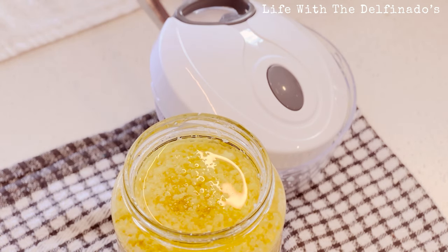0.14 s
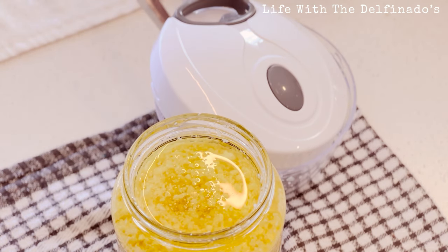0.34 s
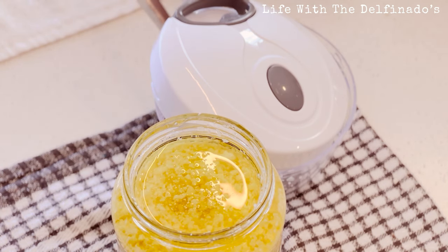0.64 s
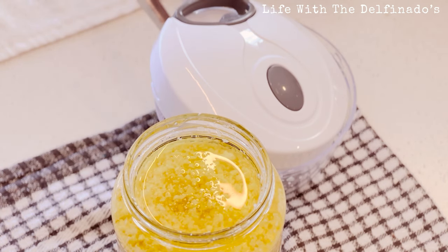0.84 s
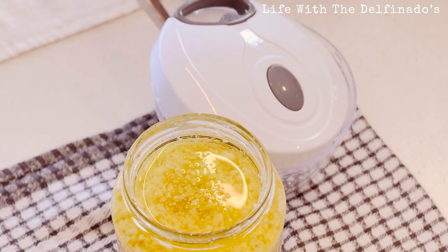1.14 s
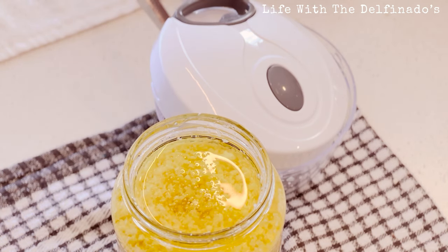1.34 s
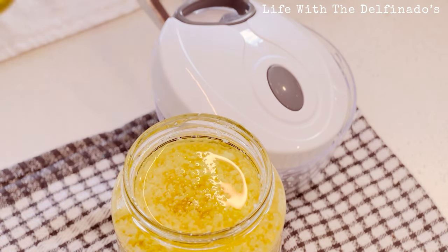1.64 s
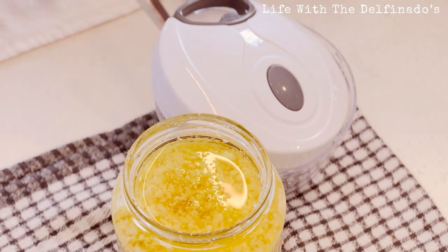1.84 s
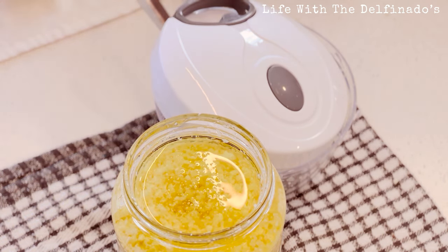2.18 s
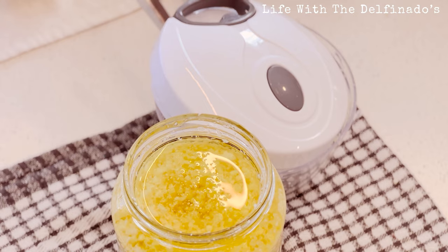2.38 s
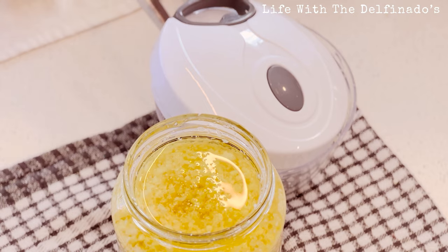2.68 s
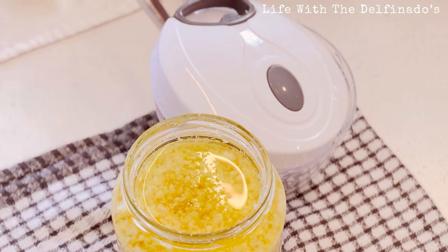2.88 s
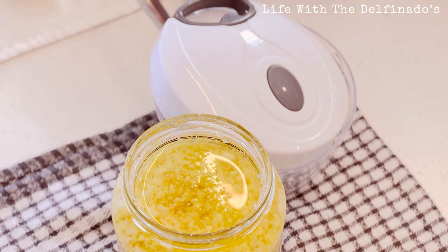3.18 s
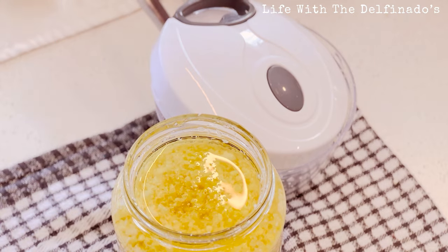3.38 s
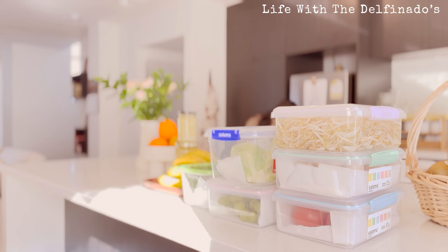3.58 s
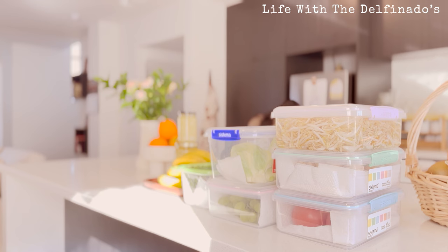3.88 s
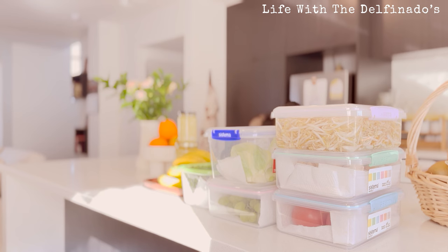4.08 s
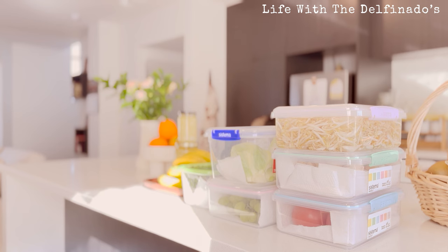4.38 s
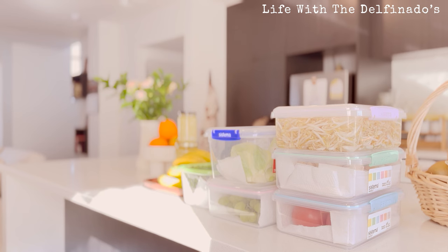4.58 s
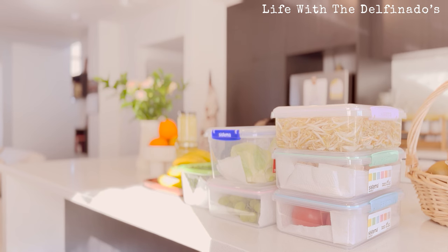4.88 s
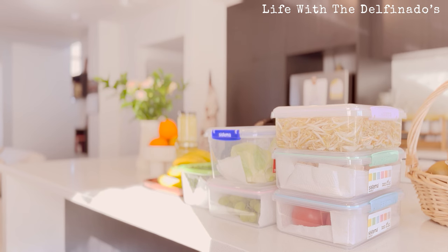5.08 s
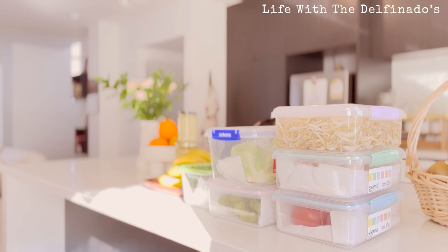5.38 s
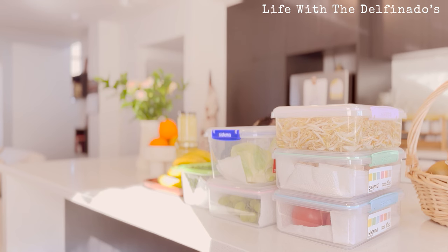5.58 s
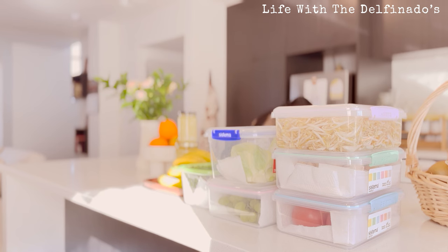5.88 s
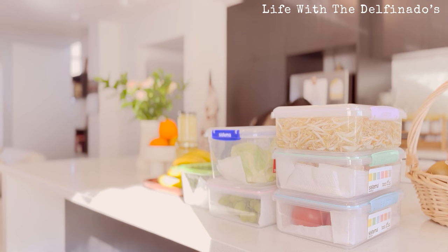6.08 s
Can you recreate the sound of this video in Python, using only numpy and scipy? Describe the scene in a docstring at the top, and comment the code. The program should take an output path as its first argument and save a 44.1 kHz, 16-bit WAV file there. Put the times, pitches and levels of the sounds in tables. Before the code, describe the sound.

In a hard-walled kitchen, a glass jar is rubbed and ticks faintly close to a stereo microphone pair, and the table takes a soft bump. Halfway through, the faint background hum grows into a louder, steady fridge hum. Further off, sheets of paper crinkle into a plastic drawer, which scrapes along its rails, rattles and bangs shut with a short room echo.

```python
"""Putting things away in a kitchen

A stereo pair stands in a hard-walled kitchen. The background crossfades from a faint wavering hum
and light room tone to a louder, steady fridge hum and deep room tone.
Close to the microphones a glass jar is rubbed and ticks faintly, and the table takes a soft bump.
Further off, sheets of paper crinkle into a plastic drawer, which scrapes, rattles and bangs shut."""
import sys
import numpy as np
from scipy import signal
from scipy.fft import rfft, irfft
from scipy.io import wavfile
from scipy.ndimage import uniform_filter1d

SR = 44100
rng = np.random.default_rng(int(sys.argv[2]) if len(sys.argv) > 2 else 0)


def transcribe(signal):
    """Save signal, clipped to [-1, 1], as a 16-bit WAV file at the path in sys.argv[1]."""
    frames = np.atleast_2d(signal).T
    limited = np.clip(frames, -1, 1)
    pcm = np.round(limited * 32767).astype(np.int16)
    wavfile.write(sys.argv[1], SR, pcm)


N = 274743
TIME = np.arange(N) / SR


def gain_of(db):
    """Decibels to a factor."""
    return 10 ** (np.asarray(db) / 20)


def unit_rms(x):
    """Scales to an rms of 1."""
    return x / np.sqrt(np.mean(x ** 2) + 1e-20)


def unit_burst(x):
    """Scales a short sound so that its energy, spread over 30 ms, has an rms of 1."""
    return x / np.sqrt(np.mean(np.sum(x ** 2, -1)) / (.03 * SR) + 1e-20)


def at_hz(points, hz):
    """Reads a spectrum on a log-frequency axis."""
    f, value = np.transpose(points)
    return np.interp(np.log(hz + 1), np.log(f + 1), value)


def over_time(points):
    """Joins (time, value) points into a curve."""
    return np.interp(TIME, *np.transpose(points))


def decay(t, t60):
    """Falls by 60 dB in t60 seconds."""
    return np.exp(-np.log(1000) * t / np.maximum(t60, 1e-3))


def swell(t, rise, t60):
    """A soft start and an exponential decay."""
    return (1 - np.exp(-t / rise)) * decay(t, t60)


def stroke(start, rise, length, sag_db_per_s, release_t60):
    """A hand movement: it builds up smoothly, weakens while it lasts, then dies away."""
    t = TIME - start
    attack = np.sin(np.pi / 2 * np.clip(t / max(rise, 1e-3), 0, 1)) ** 2
    sag = gain_of(-sag_db_per_s * np.maximum(t - rise, 0))
    return attack * sag * decay(np.maximum(t - length, 0), release_t60)


def swings(size):
    """Random swings of rms 1, each lasting about size samples."""
    return unit_rms(uniform_filter1d(rng.standard_normal(N), size=size))


def crackle(length, per_s, spread_db):
    """Random clicks of uneven size."""
    sizes = gain_of(spread_db * np.minimum(rng.exponential(1, length), 4))
    return unit_rms(sizes * rng.choice([-1, 1], length) * (rng.random(length) < per_s / SR))


def colour(x, db_at, size=4096):
    """Minimum-phase filter with the gain db_at(f)."""
    hz = abs(np.fft.fftfreq(size, 1 / SR))
    log_gain = np.log(gain_of(np.maximum(db_at(hz), -100)))
    taps = np.fft.ifft(np.exp(np.conj(signal.hilbert(log_gain)))).real[:size // 2]
    return signal.fftconvolve(np.atleast_2d(x), taps[None], axes=1)[:, :x.shape[-1]]


def add(mix, start, sound):
    """Mixes a sound in at start seconds."""
    part = mix[:, round(start * SR):][:, :sound.shape[-1]]
    part += sound[..., :part.shape[-1]]


def pan(right_db):
    """Gains of the two microphones, the right one louder by right_db."""
    return gain_of(np.array([[-.5], [.5]]) * right_db)


def from_right(x, samples):
    """The sound reaches the right microphone a few samples before the left."""
    return np.array([np.roll(x[0], samples), x[-1]])


# reverberation between the hard walls: f/Hz, t60/s
ROOM_DECAY = [(100, 0.22), (400, 0.55), (1200, 0.53), (2700, 0.5), (5500, 0.43), (8000, 0.36),
              (15000, 0.032)]


def kitchen(x, wet_db, early_db=0, early_t60=0.097, size=32000):
    """Direct sound, then reflections from the counter and the long tail of the room."""
    echoes = rng.standard_normal((2, size)) * (rng.random((2, size)) < .12)
    hz, t, bands = signal.stft(echoes, SR, nperseg=256)
    fade = decay(t, at_hz(ROOM_DECAY, hz)[:, None]) + gain_of(early_db) * decay(t, early_t60)
    response = signal.istft(bands * fade, SR, nperseg=256)[1]
    response *= gain_of(wet_db) / np.linalg.norm(response, axis=1, keepdims=True)
    response[:, 0] += 1  # direct path
    heard = signal.fftconvolve(np.atleast_2d(x), response, axes=1)[:, :x.shape[-1]]
    return heard / np.sqrt(1 + gain_of(wet_db) ** 2)


def air(spectrum, level_db, likeness, balance):
    """Steady noise, alike at both microphones in the bass; the level is that of its low mids."""
    hz = np.fft.rfftfreq(N, 1 / SR)
    left, unrelated = rfft(rng.standard_normal((2, N)))
    same = np.clip(at_hz(likeness, hz), -1, 1)
    right = same * left + np.sqrt(1 - same ** 2) * unrelated
    pair = np.array([left, right]) * gain_of(at_hz(spectrum, hz))
    low_mids = irfft(pair[0] * (hz > 110) * (hz < 900), N)
    return gain_of(level_db) * irfft(pair * pan(-at_hz(balance, hz)), N) / low_mids.std()


# spectra of the light and the deep room tone: f/Hz, relative level/dB
LIGHT_SPECTRUM = [(20, -21), (58, -7.5), (97, -6), (150, -13.5), (260, -16), (420, -19.5), (850, -27),
                  (1200, -38.5), (2000, -38.5), (3500, -53.5), (8500, -46), (10200, -53), (12000, -50.5),
                  (16000, -101)]
DEEP_SPECTRUM = [(20, -15), (35, -14.5), (55, -1.5), (75, -0.5), (105, -17), (135, -16), (270, -16),
                 (400, -21), (600, -36.5), (1200, -42.5), (5000, -54.5), (7600, -46), (10000, -65.5),
                 (16000, -72)]
# their likeness at the two microphones: f/Hz, correlation (-1 to 1)
LIGHT_LIKENESS = [(60, 1), (130, 0.86), (290, 1), (640, 0.39), (1410, 0.058), (3100, 1), (6800, 0.1)]
DEEP_LIKENESS = [(60, 0.81), (130, 1), (290, 0.25), (640, -0.09), (1410, -0.53), (3100, 0.25),
                 (6800, -0.16)]
# their balance: f/Hz, left over right/dB
LIGHT_BALANCE = [(180, -0.5), (550, 1), (1650, -4), (5000, -2), (15000, 0)]
DEEP_BALANCE = [(60, -2), (180, -2), (1650, 2.5), (5000, 6), (15000, 6)]
# the crossfade between them: t/s, deep share of the power (0 to 1)
DEEP_SHARE = [(0, 0.19), (2.95, 0.21), (3.6, 0.96), (6.23, 0.92)]


def room_tone():
    """The room tone, all round the microphones, crossfades from light to deep."""
    share = np.clip(over_time(DEEP_SHARE), 0, 1)
    light = air(LIGHT_SPECTRUM, level_db=-51.5, likeness=LIGHT_LIKENESS, balance=LIGHT_BALANCE)
    deep = air(DEEP_SPECTRUM, level_db=-49.5, likeness=DEEP_LIKENESS, balance=DEEP_BALANCE)
    return np.sqrt(1 - share) * light + np.sqrt(share) * deep


def motor_turns(hz, waver):
    """A motor's turns, counted from a random start, at a slightly unsteady speed."""
    return np.cumsum(hz * (1 + waver * swings(size=4000))) / SR + rng.random()


# the faint hum, one tone near 82 Hz with two neighbours too weak to hear: f/Hz, level/dB
FAINT_TONES = [(78.8, -101), (81.9, -46), (84.0, -95.5)]
# overtones and side tones of the steady hum: multiple of its pitch, relative level/dB
HUM_OVERTONES = [(1.27, -18.5), (1.999, -18), (3.001, -18), (3.498, -29.5), (4.559, -36.5)]


def fridge(hum_hz=78.9, hum_db=-34, fade_from_s=2.59, fade_length_s=1.45):
    """A faint, slightly wavering tone crossfades to a louder, steady hum right of the microphones."""
    faint = sum(gain_of(db) * np.sin(2 * np.pi * motor_turns(hz, waver=0.0079))
                for hz, db in FAINT_TONES)
    turns = motor_turns(hum_hz, waver=0.0022)
    overtones = sum(gain_of(db) * np.sin(2 * np.pi * (multiple * turns + rng.random()))
                    for multiple, db in HUM_OVERTONES)
    hum = gain_of(hum_db) * pan(right_db=3) * (np.sin(2 * np.pi * turns) + overtones)
    fade = np.clip((TIME - fade_from_s) / fade_length_s, 0, 1)
    return np.sqrt(2) * ((1 - fade) * faint + fade * from_right(hum, samples=10))


# bumps of the table and the cabinet: t/s, level/dB, f/Hz, t60/s
FURNITURE_BUMPS = [(2.035, -25, 145, 0.18), (2.049, -23, 87.5, 0.25), (2.067, -29, 57.4, 0.6),
                   (2.14, -35, 128, 0.22), (4.065, -22.5, 101, 0.37), (4.108, -30, 119, 0.091),
                   (4.6, -17, 193, 0.36), (4.606, -18, 100, 0.31)]


def furniture(rise_s=0.00092, size=16000):
    """Each dull bump rings one low mode, alike at both microphones."""
    out, t = np.zeros((2, N)), np.arange(size) / SR
    for start, db, hz, t60 in FURNITURE_BUMPS:
        add(out, start, gain_of(db) * np.sin(2 * np.pi * hz * t) * swell(t, rise_s, t60))
    return out


# light touches on the jar: middle t/s, width/s, level/dB
TOUCHES = [(0.13, 0.032, -59.5), (0.295, 0.04, -64), (0.465, 0.035, -62), (0.6, 0.016, -53.5),
           (0.87, 0.033, -56.5), (0.975, 0.071, -61.5), (1.135, 0.035, -52), (1.405, 0.028, -60.5)]
# their hiss: f/Hz, relative level/dB
TOUCH_SPECTRUM = [(2000, -16), (5000, -2), (8000, -2), (9500, -3.5), (11500, -12), (14000, 0.5), (16000, 2)]


def jar_brushing():
    """A light touch slides over the jar: a thin hiss that swells and fades."""
    touch = sum(gain_of(db) * np.exp(-((TIME - middle) / width) ** 2) for middle, width, db in TOUCHES)
    slips = crackle(N, per_s=12000, spread_db=7.5)
    hiss = unit_rms(colour(slips, lambda f: at_hz(TOUCH_SPECTRUM, f)))
    return kitchen(hiss * touch, wet_db=-1)


# strokes on the jar: t/s, rise/s, length/s, relative level/dB, fizz gain/dB, mode shift/octaves
RUB_STROKES = [(0.133, 0.21, 0.25, -47.5, -6.5, -0.021), (0.254, 0.043, 0.026, -44.5, -14, 0.13),
               (0.398, 0.059, 0.095, -47, -12, -0.069), (0.878, 0.017, 0.034, -48, -10, 0.028),
               (0.89, 0.076, 0.097, -56.5, 2, 0.11), (1.217, 0.059, 0.14, -55, -4.5, 0.12),
               (1.59, 0.14, 0.16, -59.5, -7, 0.1), (1.73, 0.08, 0.14, -60, -15, -0.031),
               (2.388, 0.011, 0.051, -61.5, -17, -0.4)]
# the jar's damped resonances: f/Hz, half width/Hz, relative level/dB
DAMPED_MODES = [(1750, 195, 3.5), (2243, 260, 2.5), (2570, 330, 0), (2945, 120, -4.5), (3570, 460, -11.5),
                (4390, 145, -10.5), (6130, 280, -11.5), (6570, 210, -10), (8000, 220, -11)]
# the fizz of the slips: f/Hz, relative level/dB
FIZZ_SPECTRUM = [(2000, -35), (3500, -4), (4600, 14), (5400, 8), (6050, 9), (6400, 5), (6900, 8),
                 (8000, -2.5), (10000, -9), (15500, -43)]


def jar_rubbing(body_db=-1, fizz_db=-3, grip_db=0.96, vary_db=1.0):
    """Close up, tiny slips merge into a fizz and wake resonances that shift with each new hold."""
    grip = gain_of(grip_db * swings(size=300))
    slips = crackle(N, per_s=7000, spread_db=2.5) * grip
    fizz = unit_rms(colour(slips, lambda f: at_hz(FIZZ_SPECTRUM, f))) * gain_of(fizz_db)
    out = np.zeros((2, N))
    for start, rise, length, level_db, treble_db, octaves in RUB_STROKES:
        modes = [(hz * 2 ** octaves, width, gain_of(db + vary_db * rng.standard_normal()))
                 for hz, width, db in DAMPED_MODES]
        power = lambda f: sum((gain / (1 + ((f - hz) / width) ** 2)) ** 2 for hz, width, gain in modes)
        body = unit_rms(colour(slips, lambda f: 10 * np.log10(power(f)))) * gain_of(body_db)
        hand = gain_of(level_db) * stroke(start, rise, length, sag_db_per_s=78, release_t60=0.23)
        out += (body * pan(right_db=2) + gain_of(treble_db) * fizz) * hand
    return kitchen(out, wet_db=-5.5)


def ring(modes, t, split=0.0057):
    """Dying modes in close, beating pairs, reaching each microphone in their own phase."""
    sine = lambda hz: np.sin(2 * np.pi * (hz * t + rng.random((2, 1))))
    return sum(gain_of(db) * decay(t, t60) * (sine(hz) + .5 * sine(hz * (1 + split)))
               for hz, db, t60 in modes)


# modes of the glass and of its metal lid: f/Hz, relative level/dB, t60/s
GLASS_MODES = [(1965, -11, .13), (2202, 2, .12), (2616, -6, .14), (3074, -9, .1), (3666, -10, .09),
               (4240, -10, .08), (5033, -9, .075), (6029, -7, .08), (6245, 5, .055), (6783, -3, .07)]
LID_MODES = [(3000, -8, .025), (4100, -9, .02), (6750, -6, .02), (7843, -4, .045), (9650, -7, .022),
             (13950, 4, .02), (15090, -2, .022)]
# contacts on the jar: t/s, level/dB, centre f/Hz, spread/octaves, t60/s, glass/dB, lid/dB, room/dB
JAR_CONTACTS = [(0.511, -49.5, 1940, 0.25, 0.01, -17, -40, -8),
                (0.684, -68.5, 6840, 0.29, 0.0038, -41, -30, -16),
                (0.894, -54, 2500, 0.33, 0.058, -3, -35, 2),
                (1.261, -57.5, 5400, 0.13, 0.16, -22, -33, -16),
                (1.429, -48.5, 13000, 1.16, 0.028, -28, 3, -5.5),
                (1.618, -54, 2040, 0.16, 0.017, 4.5, -15, -14),
                (2.143, -69, 780, 0.23, 0.0067, -20, -35, -1), (2.387, -56, 1630, 0.34, 0.02, -19, -50, -1),
                (2.55, -54.5, 6170, 0.12, 0.02, 17, -30, -9), (2.553, -53, 2400, 0.86, 0.09, 15, -25, -2),
                (2.749, -56.5, 596, 0.61, 0.01, -18, -35, -21),
                (2.750, -54, 1970, 1.06, 0.0025, -9, -32, 0.5),
                (2.846, -61, 2030, 0.2, 0.04, -18, -39.5, 4)]


def jar_ticks(ring_rise_s=0.0016, size=16000):
    """Scratchy contacts near the microphones set glass and lid ringing; long ones start softly."""
    out, t = np.zeros((2, N)), np.arange(size) / SR
    for start, db, centre_hz, octaves, t60, glass_db, lid_db, wet_db in JAR_CONTACTS:
        band = lambda f: -3 * np.log2((f + 1) / centre_hz) ** 2 / octaves ** 2
        scratch = unit_burst(colour(rng.standard_normal(size) * swell(t, t60 / 2, t60), band))
        glass = unit_burst(colour(ring(GLASS_MODES, t) * (1 - np.exp(-t / ring_rise_s)), band))
        lid = unit_burst(ring(LID_MODES, t))
        tick = scratch + gain_of(glass_db) * glass + gain_of(lid_db) * lid
        add(out, start, gain_of(db) * unit_burst(kitchen(tick, wet_db)))
    return out


# how hard the paper is moved, one curve for each of two sheets: t/s, relative level/dB
SHEET_EFFORT = [
    [(3.0, -63.5), (3.112, -50.5), (3.14, -39.5), (3.222, -48), (3.245, -34.5), (3.335, -39), (3.38, -30),
     (3.425, -33.5), (3.53, -34), (3.558, -33.5), (3.70, -39), (3.754, -50), (3.776, -42.5), (3.86, -80),
     (3.95, -86)],
    [(3.97, -64), (3.996, -48.5), (4.104, -45.5), (4.116, -36.5), (4.372, -69), (4.5, -59.5), (4.55, -61)],
]
# creases that snap: t/s, relative level/dB, t60/s
CREASE_SNAPS = [(3.13, -36, 0.083), (3.368, -29, 0.032), (3.453, -29, 0.013), (3.559, -29.5, 0.024),
                (4.115, -31, 0.043), (4.204, -38, 0.081), (4.577, -40.5, 0.092), (5.46, -60.5, 0.033),
                (5.976, -62.5, 0.15), (6.069, -54.5, 0.2)]
# the paper's colour: f/Hz, gain/dB
PAPER_SPECTRUM = [(120, 1), (250, 3), (420, 3), (1100, 4.5), (1800, 0), (2500, 2), (4200, -2), (8000, 0),
                  (9500, -3), (11500, -6), (14000, -3.5), (16000, -3.5)]
# its balance at the microphones: f/Hz, left over right/dB
PAPER_BALANCE = [(400, 4), (1300, -2), (2400, -0.5), (4400, 2), (8000, 7.5), (15000, -9)]


def paper(hiss_db=3.0, clump_db=2.5, size=9000, patches=4):
    """Further off, dense crinkles follow the hand's movement and single creases snap."""
    effort = sum(gain_of(over_time(sheet)) * (TIME >= sheet[0][0]) * (TIME < sheet[-1][0])
                 for sheet in SHEET_EFFORT)
    clumps = gain_of(hiss_db + clump_db * swings(size=500))
    crinkles = (clumps * effort * crackle(N, per_s=11000, spread_db=2.0))[None]
    t = np.arange(size) / SR
    for start, db, t60 in CREASE_SNAPS:
        snap = crackle(size, per_s=2700, spread_db=5.5) * swell(t, rise=0.0028, t60=t60)
        add(crinkles, start, gain_of(db) * unit_burst(snap))
    # the crinkling wanders between patches, each with its own echoes
    active = np.argmax([swings(size=2500) for _ in range(patches)], axis=0)
    heard = sum(kitchen(crinkles * (active == patch), wet_db=7.0, early_db=-1.0, early_t60=0.27)
                for patch in range(patches))
    pair = [colour(x, lambda f: at_hz(PAPER_SPECTRUM, f) + side * at_hz(PAPER_BALANCE, f))[0]
            for x, side in zip(heard, (.5, -.5))]
    return from_right(pair, samples=10)


# broad colour of the drawer's shell: f/Hz, gain/dB
SHELL_SPECTRUM = [(35, -5.5), (100, -1.5), (140, 3.5), (200, 4), (300, 4.5), (400, 3), (700, 3),
                  (880, -3.5), (1000, -2.5), (1550, -4.5), (1820, -13.5), (2150, -9.5), (2800, -13.5),
                  (4000, -20.5), (7500, -26.5), (15000, -58.5)]
# its modes: f/Hz, width/Hz, level over that colour/dB
PLASTIC_MODES = [(101, 7.7, 3.8), (195, 17, 6.6), (235, 41, 4.6), (392.7, 23.6, 10.1), (737, 18, 1.6),
                 (827, 26, 6.7), (1067, 74, 2.1), (1214, 15, 1.6), (1400, 18, 2.5), (1455, 44, 1.6),
                 (1730, 10, 8.8), (1895, 106, 6.3), (2500, 65, 1.8), (2866, 80, 3), (2980, 78, 2.7),
                 (3420, 45, 3.1), (4800, 21, 6.4), (5800, 75, 3.1)]


def drawer_shell(x, vary_db=2.5, detune=0.0015):
    """The hollow plastic colours whatever shakes it; each place of contact favours other modes."""
    modes = [(hz * (1 + detune * rng.standard_normal()), width, db + vary_db * rng.standard_normal())
             for hz, width, db in PLASTIC_MODES]
    peaks = lambda f: sum(gain_of(db) ** 2 / (1 + (2 * (f - hz) / width) ** 2)
                          for hz, width, db in modes)
    return colour(x, lambda f: at_hz(SHELL_SPECTRUM, f) + 10 * np.log10(1 + peaks(f)), size=16384)


# pushes that run the drawer along its rails: t/s, rise/s, length/s, relative level/dB
PUSHES = [(3.031, 0.071, 0.37, -39.5), (4.058, 0.022, 0.2, -30), (4.258, 0.05, 0.096, -35.5),
          (4.385, 0.12, 0.2, -31.5), (5.69, 0.065, 0.12, -55.5), (5.815, 0.041, 0.08, -56.5),
          (5.947, 0.019, 0.31, -51.5)]


def drawer_rails(slide_db=-2, low_cut_hz=330):
    """The running drawer scrapes through its shell; friction slows each push until it stops."""
    grit = drawer_shell(crackle(N, per_s=740, spread_db=4.0))
    scrape = unit_rms(colour(grit, lambda f: -10 * np.log10(1 + (low_cut_hz / (f + 1)) ** 2)))
    speed = sum(gain_of(db + slide_db) * stroke(start, rise, length, sag_db_per_s=47.5, release_t60=0.11)
                for start, rise, length, db in PUSHES)
    return kitchen(scrape * speed, wet_db=9, early_db=2.5)


# blows on the drawer: t/s, relative level/dB, bass/dB, treble/dB, rattle t60/s, hollow f/Hz
DRAWER_BLOWS = [(3.608, -25.5, -4.5, -1, 0.34, 530), (3.761, -35.5, 0, 11, 0.16, 740),
                (4.055, -31.5, 2.5, 3.5, 0.056, 3100), (4.061, -26.5, -3.5, -32, 0.14, 546),
                (4.110, -25, -15, 5.5, 0.14, 1350), (4.168, -33, -12.5, -2, 0.1, 3100),
                (4.203, -30, -18.5, -17, 0.16, 980), (4.237, -35.5, -10.5, -5, 0.14, 1390),
                (4.287, -41.5, 3, 14, 0.057, 3020), (4.313, -41, 20, 1, 0.037, 3050),
                (4.353, -34.5, -1.5, -28.5, 0.13, 514), (4.385, -25.5, -17.5, -11, 0.17, 1120),
                (4.412, -31, -11, -8.5, 0.07, 1350), (4.453, -27.5, 3, -2, 0.37, 190),
                (4.474, -26, -11.5, -20.5, 0.12, 704), (4.570, -21, -11, 2, 0.21, 1750),
                (4.588, -21.5, 9, 2, 0.083, 1000), (4.624, -25.5, 11, -2, 0.058, 285),
                (4.660, -30, 24.5, 0, 0.079, 179), (4.684, -35, -14, -4.5, 0.027, 1880),
                (4.865, -64.5, -3, 8, 0.026, 2960), (6.065, -47.5, 5.5, 11.5, 0.087, 1820)]


def drawer_knocks(gain_db=5.0, blow_db=-3, rise_s=0.0023, hollow_db=5.5, hollow_octaves=0.32, size=36000):
    """Each blow rattles the contents and booms in the struck wall; at this distance the room leads."""
    out, t = np.zeros((2, N)), np.arange(size) / SR
    blow = gain_of(blow_db) * unit_burst(1. * (t == 0))
    for start, db, bass_db, treble_db, t60, hollow_hz in DRAWER_BLOWS:
        rattle = unit_burst(crackle(size, per_s=1900, spread_db=4.5) * swell(t, rise_s, t60))
        hardness = lambda f: bass_db / (1 + (f / 260) ** 4) + treble_db * f ** 2 / (f ** 2 + 1300 ** 2)
        boom = lambda f: hollow_db * np.exp(-(np.log2((f + 1) / hollow_hz) / hollow_octaves) ** 2)
        knock = colour(drawer_shell(blow + rattle), lambda f: hardness(f) + boom(f))
        add(out, start, gain_of(db + gain_db) * unit_burst(kitchen(knock, wet_db=12.5, early_db=-8)))
    return out


def close_pair(x, corner_hz=520):
    """The microphones stand close together, so long waves reach both alike."""
    mid, side = x.mean(0), (x[0] - x[1]) / 2
    side = signal.sosfilt(signal.butter(1, corner_hz, "high", fs=SR, output="sos"), side)
    return np.array([mid + side, mid - side])


def scene():
    """The background, the near sounds and the far ones at the two microphones."""
    background = room_tone() + fridge()
    near = furniture() + jar_brushing() + jar_rubbing() + jar_ticks()
    drawer = from_right(drawer_rails() + drawer_knocks(), samples=2) * pan(right_db=0.8)
    return background + near + close_pair(paper() + drawer)


# sum and difference of the pair, out of phase near 11 kHz and in phase near 14.5 kHz: f/Hz, gain/dB
MID_RESPONSE = [(10200, -0.5), (10900, -22.5), (11600, -18), (12400, -4.5), (13600, 2), (16000, 0.5)]
SIDE_RESPONSE = [(7800, -1), (8600, -11), (9600, 1.5), (11000, 7), (12500, 4), (14200, -22), (16000, -4)]


def record(dry, notch_hz=7450, notch_half_width_hz=260, notch_until_s=3.05, band_limit_hz=16000):
    """The microphone pair colours the top treble and the recorder limits the band."""
    hz = np.fft.rfftfreq(N, 1 / SR)
    dry = dry * np.clip(np.minimum(TIME, TIME[::-1]) / .005, 0, 1)  # 5 ms fades
    mid = irfft(rfft(dry.mean(0)) * gain_of(at_hz(MID_RESPONSE, hz)), N)
    side = irfft(rfft((dry[0] - dry[1]) / 2) * gain_of(at_hz(SIDE_RESPONSE, hz)), N)
    pair = np.array([mid + side, mid - side])
    # a narrow band of the treble is missing until the paper starts
    band = irfft(rfft(pair) * np.exp(-((hz - notch_hz) / notch_half_width_hz) ** 2), N)
    pair -= band * (TIME < notch_until_s)
    low_pass = signal.firwin(511, band_limit_hz, window=("kaiser", 9), fs=SR)
    return signal.oaconvolve(pair, low_pass[None], "same")


dry = scene()
out = record(dry)
transcribe(out)
```